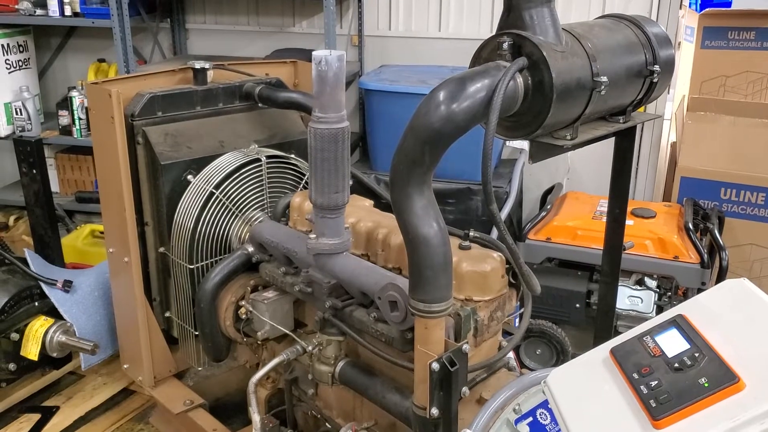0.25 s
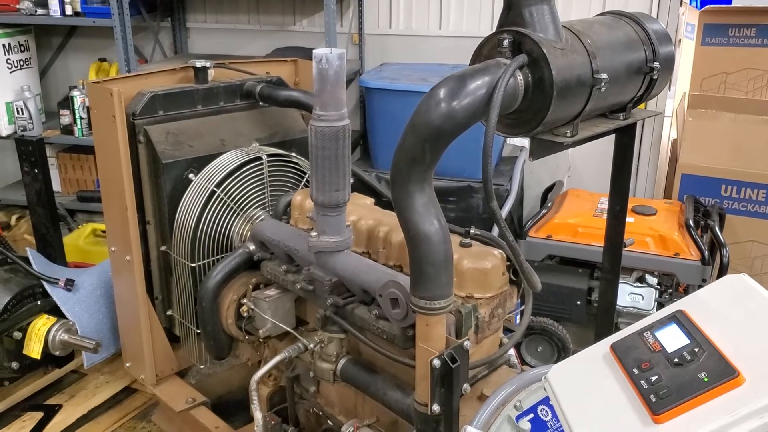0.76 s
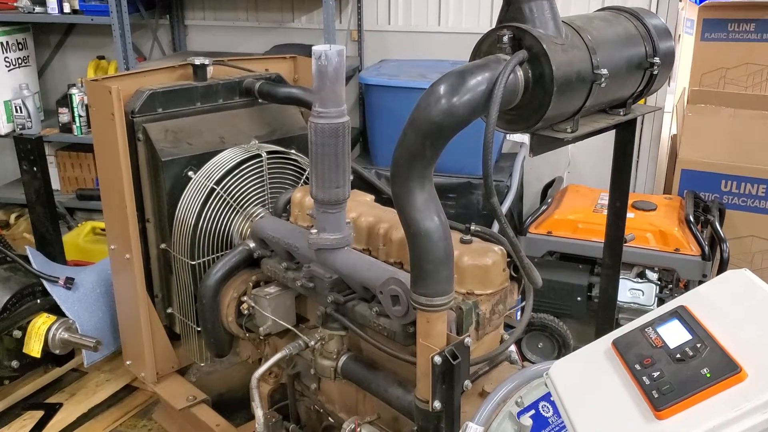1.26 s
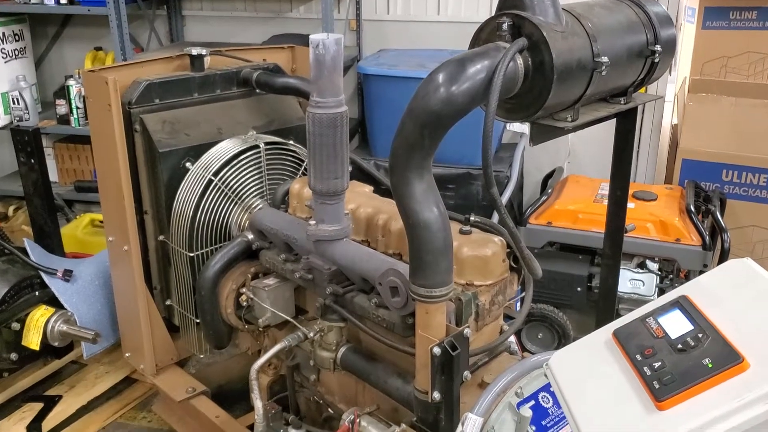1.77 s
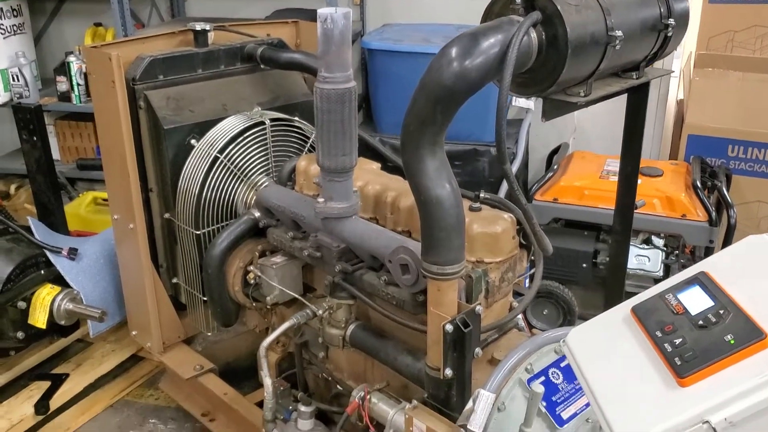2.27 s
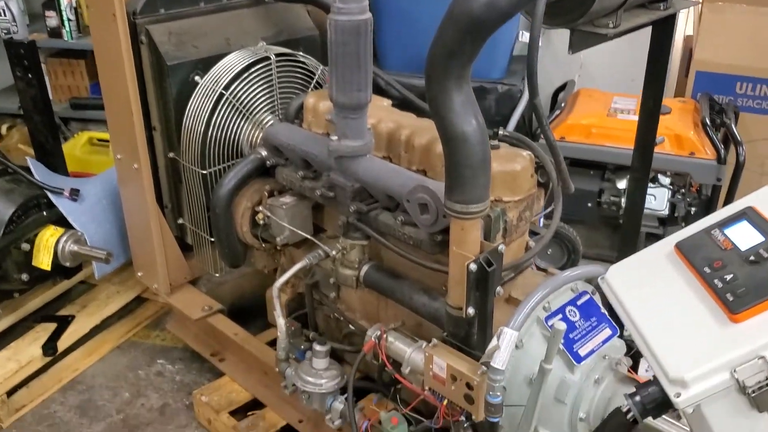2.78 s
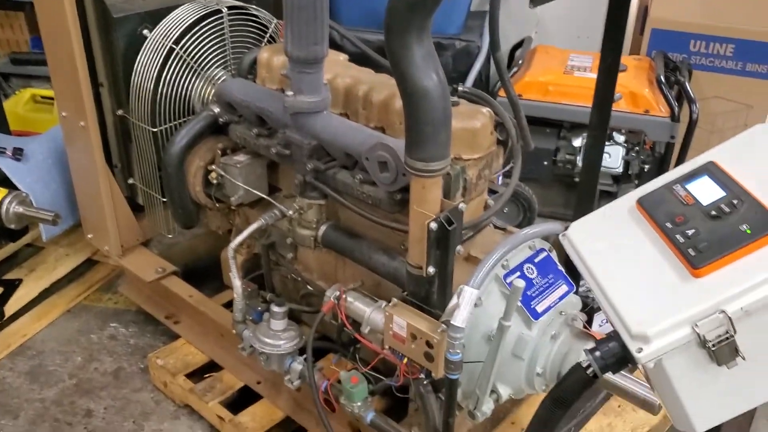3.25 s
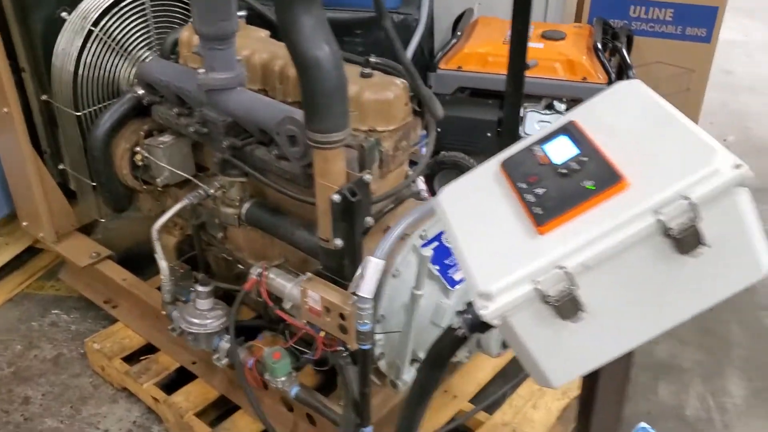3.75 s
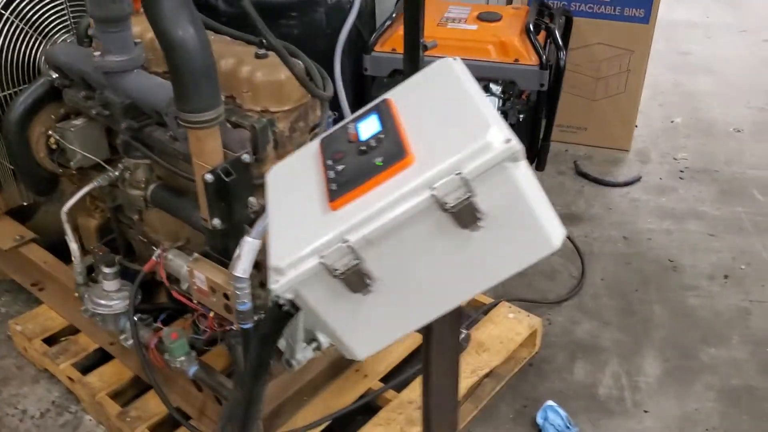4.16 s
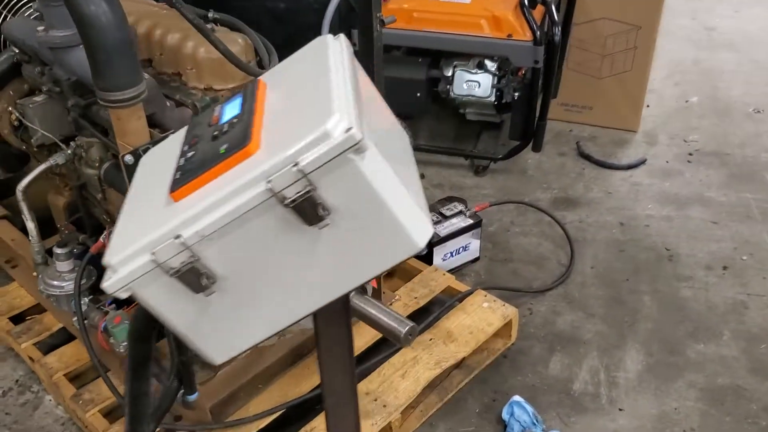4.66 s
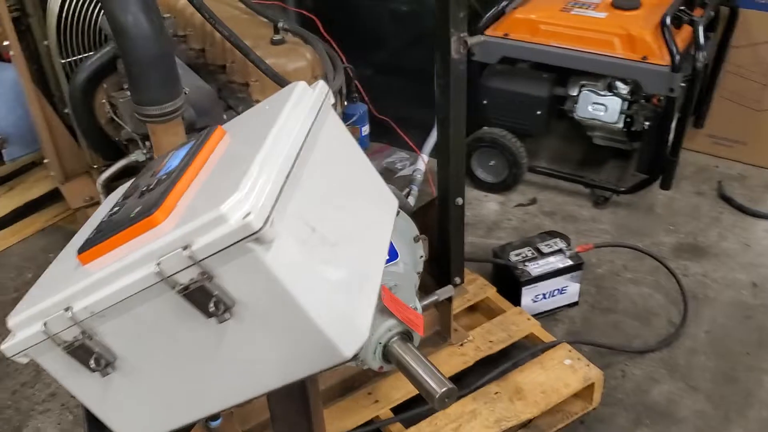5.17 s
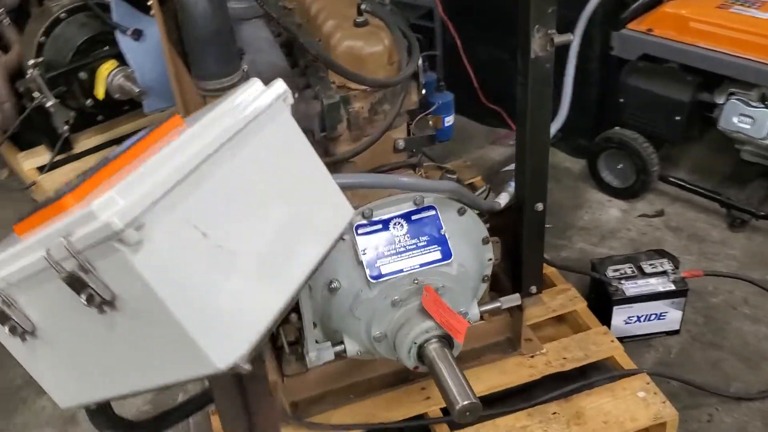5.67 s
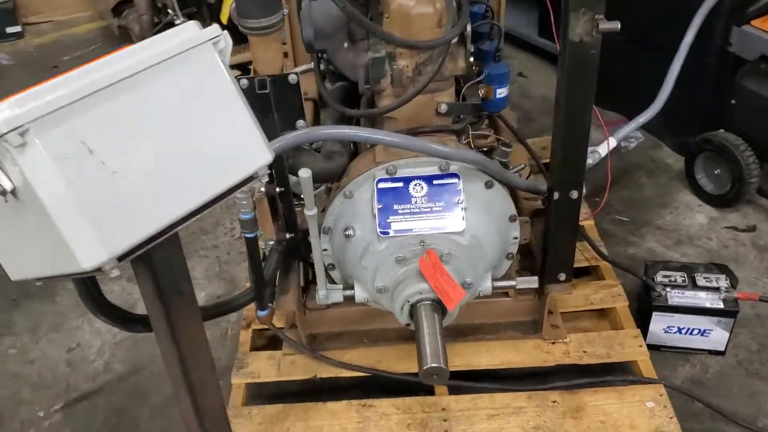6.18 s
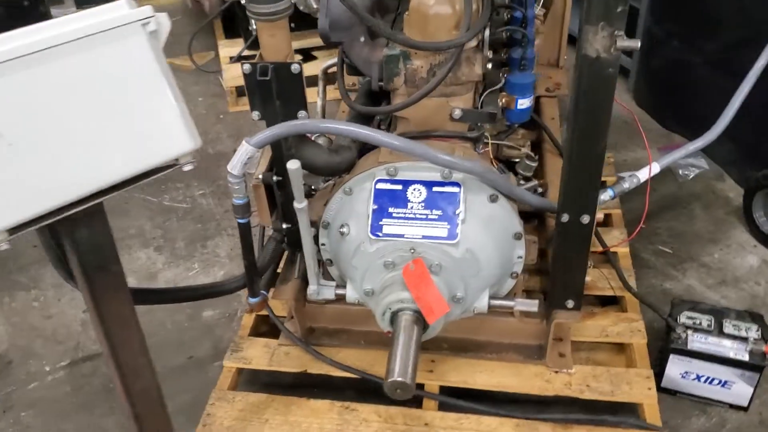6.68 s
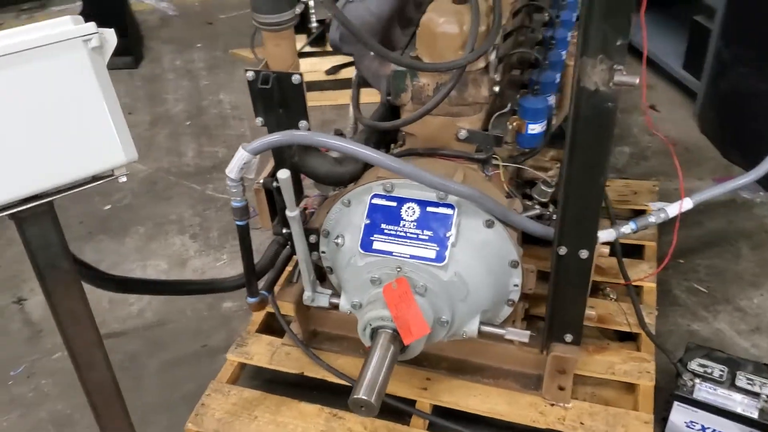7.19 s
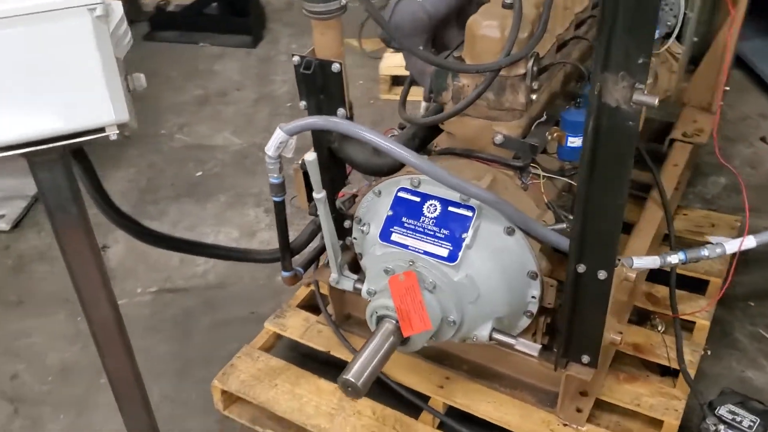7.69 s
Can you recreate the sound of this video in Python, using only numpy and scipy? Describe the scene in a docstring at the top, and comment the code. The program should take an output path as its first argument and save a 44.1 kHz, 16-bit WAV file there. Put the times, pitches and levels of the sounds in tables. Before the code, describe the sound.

From 0 s a large six-cylinder engine is already running in a workshop, heard close by in stereo, and it continues without a break to about 8 s. A deep, nearly pure exhaust boom around 85 Hz dominates, with a weaker octave and a low roar beneath. Over it lie a grainy growl, rapid dull knocks ringing in the metal block, and a fluttering hollow hum in a pipe, fullest near 3.6 s. Fan and intake air make a steady soft hiss with tiny valve ticks and crackle. From about 2.5 to 4.2 s the listener moves from side to rear; the mechanical colour shifts and the treble jumps brighter at 3.4 s, then settles. Around 4.75 s the hiss is slightly shaded. The boom swells a little near 5.6 s. The speed sinks gradually to about 80 firings per second, still running at the end.

```python
"""A large six-cylinder gas engine runs in a workshop, its speed slowly falling, as the listener walks from side to rear.
The exhaust booms as two tones at the firing rate and its octave; sines on multiples of the two-turn cycle add growl.
Clicks at set crank angles ring the block, and filtered noise that partly repeats each cycle makes it rumble.
Resonant noise flutters in a pipe near 265 Hz; fan air, intake hiss and valve ticks are noise in the treble.
A low roar of filtered noise lies under the boom."""
import sys
import numpy as np
from scipy import signal
from scipy.io import wavfile

SR = 44100
rng = np.random.default_rng(int(sys.argv[2]) if len(sys.argv) > 2 else 0)


def unload_wav(signal):
    """Save mono or channel-first audio to the path in sys.argv[1] as 16-bit WAV at rate SR, clipped to [-1, 1]."""
    wavfile.write(
        sys.argv[1],
        SR,
        np.round(np.clip(np.atleast_2d(signal).T, -1, 1) * 32767).astype(np.int16),
    )


N = 349713
SECONDS = np.arange(N) / SR
EARS = np.array([[1], [-1]])   # sign of a left-right difference in each ear


def amp(db):
    """dB to gain."""
    return 10 ** (np.asarray(db) / 20)


def rms_one(x):
    """Scale to rms 1."""
    return x / np.sqrt(np.mean(x ** 2) + 1e-20)


def in_time(rows):
    """Columns of a curve, one value per sample."""
    s, *columns = np.transpose(rows)
    return [np.interp(SECONDS, s, c) for c in columns]


def at_hz(points, hz):
    """Read a spectrum on a log-frequency axis."""
    table_hz, values = np.transpose(points)
    return np.interp(np.log(hz), np.log(table_hz), values)


def drift(rate_hz):
    """Random wander of rms 1: noise through two equal low-pass poles, computed at every 40th sample."""
    pole = np.exp(-80 * np.pi * rate_hz / SR)
    white = rng.standard_normal(N // 40 + 2002)
    slow = signal.lfilter([1], [1, -2 * pole, pole * pole], white)[2000:]   # skip the filter's start
    return np.interp(np.arange(N) / 40, np.arange(len(slow)), rms_one(slow))


def resonate(x, hz, width_hz):
    """A resonance applied twice: steep skirts, soft onset; the width is that of one pass."""
    r = np.exp(-np.pi * width_hz / SR)
    section = [1, 0, -1, 1, -2 * r * np.cos(2 * np.pi * hz / SR), r * r]
    return signal.sosfilt([section, section], x) * ((1 - r * r) / 2) ** 2


# The walk around the engine. Each row: time in seconds, share of the way from side to rear [0-1].
WALK = [(0, 0.28), (2.0, 0.1), (2.8, 0.32), (3.2, 0.72), (4.2, 0.97), (5.5, 0.9), (7.93, 1)]


def toward_rear(side_db, rear_db):
    """A level that turns from its value at the side to its value at the rear."""
    return side_db + (rear_db - side_db) * np.clip(in_time(WALK)[0], 0, 1)


def near_spot(db, spot_s, less_db, reach_s):
    """A level that belongs to one spot of the walk and falls by less_db away from it."""
    nearness = np.exp(-((SECONDS - spot_s) / reach_s) ** 2)
    return db - less_db * (1 - nearness)


# How alike the ears are. Each row: frequency in Hz, left-right likeness [held within 0-1 when read].
LIKENESS = [(60, 1.0), (130, 0.98), (290, 0.99), (640, 0.87), (1410, 0.25), (3100, 0.067), (6820, -1),
            (15000, -0.02)]
# Balance of the ears. Each row: frequency in Hz, left minus right level in dB.
TILT = [(60, -4), (110, -3.5), (200, -1.5), (380, -0.5), (700, -2.5), (1290, -1.5), (2380, -2),
        (4400, -0.5), (8120, -2.5), (15000, -2.5)]


def spread(mid, side, hz):
    """Two ears from a shared and an opposed signal, as alike and as balanced as the tables say."""
    alike = np.clip(at_hz(LIKENESS, hz), 0, 1)
    ears = np.sqrt(1 + alike) * mid + np.sqrt(1 - alike) * side * EARS
    return ears * amp(at_hz(TILT, hz) / 2 * EARS) / np.sqrt(2)


SURGE_DB, SURGE_RATE_HZ = .8, 8.0   # each noise band briefly swells and sinks on its own
PATCHY_RATE_HZ = 2.9


def coloured(white, at_side, at_rear, edges, patchy_db):
    """Stereo noise through a band bank whose gains follow the walk and flicker; rms 1."""
    out = 0
    for k, (low, high) in enumerate(zip(edges, edges[1:])):
        band = signal.butter(2, [low, high], "band", fs=SR, output="sos")
        mid, side = signal.sosfilt(band, white[k % 2])   # neighbouring bands use separate noise
        hz = np.sqrt(low * high)
        level_db = toward_rear(at_hz(at_side, hz), at_hz(at_rear, hz))
        flicker_db = patchy_db * drift(PATCHY_RATE_HZ) + SURGE_DB * drift(SURGE_RATE_HZ)
        out = out + amp(level_db + flicker_db) * spread(mid, side, hz)
    return rms_one(out)


def turning_noise(cycles, repeating):
    """Many small contacts: part returns every cycle and changes slowly with the walk, part is new each time."""
    steps = 3160   # noise values around one cycle
    pattern = rng.standard_normal((2, 2, 9, steps))   # one pattern for each second
    step = (cycles % 1 * steps).astype(int)
    now = SECONDS.astype(int)
    fade = SECONDS % 1 * np.pi / 2   # equal-power crossfade to the next pattern
    cyclic = pattern[:, :, now, step] * np.cos(fade) + pattern[:, :, now + 1, step] * np.sin(fade)
    fresh = rng.standard_normal((2, 2, N))
    return np.sqrt(repeating) * cyclic + np.sqrt(1 - repeating) * fresh


# The boom between the ears. Each row: time in seconds, left minus right level in dB, left lag in samples.
BOOM_SIDE = [(0, -.1, 1.6), (3.1, -.3, 2.4), (4.4, -.1, -1.4), (5.1, -.5, -1), (6.2, -.8, 5),
             (7.93, -.7, 9)]
# The octave slips behind the firing tone along the walk.
OCTAVE_RAD, OCTAVE_RAD_PER_S = .95, -.19
OCTAVE_WAVER_DB, OCTAVE_WAVER_HZ = 0.66, 32


def exhaust(firings, tone_db, octave_db):
    """Gas pulses boom as a firing tone and its octave, reaching the ears a little apart."""
    pan_db, lag = in_time(BOOM_SIDE)
    phase = 2 * np.pi * (firings - EARS / 2 * lag * np.gradient(firings))
    octave_phase = 2 * phase + OCTAVE_RAD + OCTAVE_RAD_PER_S * SECONDS
    octave_gain = amp(octave_db + OCTAVE_WAVER_DB * drift(OCTAVE_WAVER_HZ))
    tones = amp(tone_db) * np.cos(phase) + octave_gain * np.cos(octave_phase)
    return np.sqrt(2) * tones * amp(EARS / 2 * pan_db)


# Uneven cylinders sound multiples of the two-turn cycle. Each row: multiple of the cycle rate,
# level at its loudest spot in dB before the shared trim, time of that spot in seconds, dB less elsewhere.
CYCLE_TONES = [(14, -42, 5.2, 2.5), (15, -42, 7.0, 7), (16, -43, 2.8, 3), (18, -35, 2.2, 2.5),
               (20, -32, 7.9, 9), (21, -42, 7.2, 6), (22, -39, 2.5, 13), (24, -39, 3.0, 7),
               (25, -39, 4.2, 6), (26, -41, 7.9, 8), (27, -41, 7.9, 7), (28, -36, 5.8, 4), (29, -41, .8, 9),
               (30, -34, 7.9, 7), (32, -40, 4.0, 8), (36, -43, 7.9, 12), (40, -41, 5.8, 5),
               (42, -44, 6.5, 9), (48, -41, 3.0, 7), (53, -39, 4.2, 10), (54, -42, 7.9, 9),
               (58, -40, 7.9, 9), (59, -41, .1, 8), (61, -42, 4.2, 3), (67, -43, 1.5, 2), (69, -43, 6.5, 9),
               (71, -43, 4.8, 9), (73, -42, 7.9, 8)]
TONES_DB, TONE_REACH_S = 0.5, 2.1   # shared trim; how long the walk stays near a loud spot


def cycle_tones(cycles):
    """Sines on multiples of the cycle rate, each wavering a little in phase and level."""
    out = 0
    for multiple, *spot in CYCLE_TONES:
        turns = multiple * cycles + rng.random((2, 1)) + 0.048 * drift(2.1)
        level_db = near_spot(*spot, TONE_REACH_S) + TONES_DB + 0.97 * drift(4.3)
        mid, side = np.sqrt(2) * amp(level_db) * np.cos(2 * np.pi * turns)
        out = out + spread(mid, side, multiple * np.gradient(cycles).mean() * SR)
    return out


def struck(clicks, hz, width_hz):
    """A unit click rings to a peak of 1; a weaker, later copy enters the ears with opposite signs."""
    unit_peak = resonate(signal.unit_impulse(2999), hz, width_hz).max()
    ring = resonate(clicks, hz, width_hz) / unit_peak
    return np.sqrt(2) * spread(ring, .5 * np.roll(ring, 12), hz)


# Knocks in the block. Each row: crank angle in degrees, push (1) or pull (-1), ring in Hz, peak at a spot
# of the walk in dB before scatter and trim, time of that spot in seconds, dB less elsewhere [negative: more].
KNOCKS = [(20, 1, 640, -31, 7.9, 15), (40, 1, 880, -24, 2.2, 6), (75, -1, 700, -29, 7.0, 15),
          (105, 1, 900, -37, 4.4, -7), (185, -1, 880, -27, 2.6, 5), (300, -1, 900, -26.5, 4.2, 3),
          (385, -1, 900, -29, 5.0, 4), (420, 1, 640, -31, 3.5, 7), (545, 1, 880, -30, 5.0, 3),
          (660, 1, 850, -21, 4.7, 7), (685, -1, 740, -27, 7.9, 13)]
# Modes of the block. Each row: frequency in Hz, width in Hz, peak in dB against the knock.
BLOCK_MODES = [(672.4, 38, -14.5), (743.6, 35, -15.5), (788.3, 29, -18.5), (851, 50, -10.5),
               (935, 42, -21.5), (981.4, 31, -20.5)]
KNOCK_WIDTH_HZ, KNOCK_SPREAD_DB, KNOCK_REACH_S = 250, 1.7, 1.76
KNOCK_DB, KNOCK_CUT_HZ = -1, 1550   # trim and low-pass of all knocks together


def knocks(cycles):
    """Each contact comes once a cycle with scattered strength, thumps briefly and rings the block's modes."""
    out, all_clicks = 0, 0
    for deg, sign, hz, *spot in KNOCKS:
        at = np.flatnonzero(np.diff(np.floor(cycles - deg / 720)))
        scatter_db = KNOCK_SPREAD_DB * rng.standard_normal(len(at))
        clicks = np.full(N, 1e-18)
        clicks[at] = sign * amp(near_spot(*spot, KNOCK_REACH_S)[at] + scatter_db)
        out = out + struck(clicks, hz, KNOCK_WIDTH_HZ)
        all_clicks = all_clicks + clicks
    for hz, width_hz, mode_db in BLOCK_MODES:
        out = out + amp(mode_db) * struck(all_clicks, hz, width_hz)
    low_pass = signal.butter(2, KNOCK_CUT_HZ, fs=SR, output="sos")
    return amp(KNOCK_DB) * signal.sosfilt(low_pass, out)


# Colour of the rumble from the side. Each row: frequency in Hz, relative level in dB per Hz.
RUMBLE_SIDE = [(180, -32), (300, -3), (350, -2), (372, -10), (409, -1), (475, -12), (530, -6), (620, -11),
               (794, -6.5), (863, -0.5), (1250, -18)]
# Colour of the rumble from the rear. Each row: frequency in Hz, relative level in dB per Hz.
RUMBLE_REAR = [(180, -41), (300, -1.5), (390, -3.5), (432, -3.5), (500, -9.5), (555, -2.5), (660, -8.5),
               (757, -4), (838, -12), (955, -5), (1250, -15.5)]
RUMBLE_DB, BLOCK_REPEATS = -28.5, .3   # rms level; share of the noise power that returns every cycle


def block_rumble(cycles):
    """Small contacts shake the block: partly repeating noise, coloured by the place of the listener."""
    edges = np.geomspace(290, 1250, 15)
    noise = turning_noise(cycles, BLOCK_REPEATS)
    return amp(RUMBLE_DB) * coloured(noise, RUMBLE_SIDE, RUMBLE_REAR, edges, patchy_db=.7)


# The engine passes from the left ear's side to the right's. Each row: time in seconds, left lag in samples.
ENGINE_LAG = [(0, -3), (3.7, -4), (4.3, -8), (6.3, 1), (7.93, 4)]


def lagged(x):
    """Each ear reads the sound half the lag early or late."""
    n = np.arange(N)
    shift = np.round(in_time(ENGINE_LAG)[0] / 2)
    return np.array([np.interp(n - shift, n, x[0]), np.interp(n + shift, n, x[1])])


# Pipe flutter. Each row: time in seconds, level in dB.
PIPE = [(0, -30.5), (2.0, -28.5), (3.6, -26.5), (5.0, -29.5), (6.6, -27.5), (7.93, -32)]
PIPE_HZ, PIPE_WIDTH_HZ = [255.7, 270], 26.4


def pipe_flutter():
    """Two close, narrow resonances turn white noise into a fluttering hum."""
    out = 0
    for hz in PIPE_HZ:
        mid, side = resonate(rng.standard_normal((2, N)), hz, PIPE_WIDTH_HZ)
        out = out + spread(mid, side, hz)
    return amp(in_time(PIPE)[0]) * rms_one(out)


# Colour of fan and intake air. Each row: frequency in Hz, relative dB per Hz at the side, same at the rear.
AIR = [(1100, 1, -2.5), (1310, -0.5, -1.5), (1610, 0.6, -2.5), (2510, 1.1, -3), (2750, -4.5, -2.5),
       (3220, -1.5, -5.5), (4300, -14, -10.5), (5220, -19, -17.5), (6700, -24.5, -18.5), (8840, -24.5, -22),
       (10260, -30, -25), (11430, -17, -17.5), (12960, -28, -24), (15600, -21.5, -24)]
# Valve seats, as brief swells of the treble hiss. Each row: crank angle in degrees, swell in dB at the side,
# swell in dB at the rear.
TICKS = [(80, 1.5, 2), (320, 1.5, 4), (620, 5, 1.5), (680, 1.5, 4)]
TICK_DEG = 10   # crank angle from a swell's peak to 1/e of its dB
AIR_REPEATS = .2   # share of the noise power that returns every cycle
LOW_SWELL, SPLIT_HZ = .35, 9000   # hiss below the split follows this share of the swell in dB


def air(firings):
    """Fan and intake hiss; the treble throbs with the firings, swells at valve seats and crackles finely."""
    deg = firings * 120 % 720
    swell_db = .7 * np.cos(2 * np.pi * firings + 1.5) - .8
    swell_db = swell_db + .5 * drift(40) + 1.3 * drift(300)   # the fine crackle
    for at, side_db, rear_db in TICKS:
        swell_db = swell_db + toward_rear(side_db, rear_db) * np.exp(-((deg - at) / TICK_DEG) ** 2)
    hz, side_db, rear_db = np.transpose(AIR)
    at_side, at_rear = np.transpose([hz, side_db]), np.transpose([hz, rear_db])
    noise = turning_noise(firings / 6, AIR_REPEATS)
    hiss = coloured(noise, at_side, at_rear, np.geomspace(1150, 17000, 27), patchy_db=.5)
    # each half of the split is filtered twice
    low = np.tile(signal.butter(2, SPLIT_HZ, "low", fs=SR, output="sos"), (2, 1))
    high = np.tile(signal.butter(2, SPLIT_HZ, "high", fs=SR, output="sos"), (2, 1))
    lower_hiss = signal.sosfilt(low, hiss) * amp(LOW_SWELL * swell_db)
    return lower_hiss + signal.sosfilt(high, hiss) * amp(swell_db)


AIR_DB = -30.5
# A control box comes between engine and listener and shades the air noise.
SHADE_DB, SHADE_S, SHADE_REACH_S = -1, 4.75, 1
# The treble brightens at once as the listener turns, then settles.
TURN_DB, TURN_S, TURN_FADE_S, TURN_HZ = 1.5, 3.4, .5, 6000


def heard_on_walk(hiss):
    """Air noise dips behind the box; its treble jumps at the turn."""
    since = SECONDS - TURN_S
    jump = amp(TURN_DB * (since > 0) * np.exp(-np.abs(since) / TURN_FADE_S)) - 1
    band = signal.butter(2, [TURN_HZ, TURN_HZ * 2.2], "band", fs=SR, output="sos")
    treble = signal.sosfilt(band, hiss)
    shade_db = near_spot(SHADE_DB, SHADE_S, SHADE_DB, SHADE_REACH_S)   # 0 dB away from the box
    return (hiss + jump * treble) * amp(shade_db)


# Colour of the low roar under the boom. Each row: frequency in Hz, relative level in dB per Hz.
ROAR = [(15, -17), (25, 5), (40, 2.5), (62, 8.5), (105, 12), (125, 1.5), (200, 1.5), (300, -7), (340, -20)]
ROAR_DB = -35.5


def low_roar():
    """Flickering bands of low noise, coloured alike at side and rear."""
    white = rng.standard_normal((2, 2, N))
    return amp(ROAR_DB) * coloured(white, ROAR, ROAR, np.geomspace(16, 330, 11), patchy_db=.6)


# Engine speed and exhaust boom. Each row: time in seconds, firings per second, firing tone in dB, octave in dB.
FIRING = [(0, 85.85, -8.9, -22.1), (0.5, 86.03, -9.6, -22.2), (1.4, 85.76, -9.5, -21.8),
          (2, 84.65, -9.5, -21.0), (2.4, 84.45, -9.6, -21.2), (3.3, 83.31, -9.8, -22.7),
          (3.8, 82.98, -10.2, -23.7), (4.3, 82.75, -10.8, -24.3), (5, 82.78, -9.8, -26.0),
          (5.6, 82.35, -8.8, -27.2), (6.1, 81.78, -9.8, -26.5), (6.8, 81.4, -9.8, -24.6),
          (7.1, 80.95, -10.4, -24.0), (7.5, 81.19, -9.6, -23.2), (7.93, 80.41, -10.0, -22.2)]
START_DEG = 89.1   # crank angle at the start


def scene():
    """Engine parts run from one crank angle: six firings, 120 degrees apart, make a cycle of two turns."""
    per_s, tone_db, octave_db = in_time(FIRING)
    firings = START_DEG / 120 + np.cumsum(per_s) / SR
    cycles = firings / 6
    boom = exhaust(firings, tone_db, octave_db)
    body = cycle_tones(cycles) + knocks(cycles) + block_rumble(cycles)
    hiss = amp(AIR_DB) * heard_on_walk(air(firings))
    return boom + lagged(body) + pipe_flutter() + hiss + low_roar()


CUTOFF_HZ = 15700


def record(dry):
    """A steep elliptic low-pass cuts the top."""
    return signal.sosfilt(signal.ellip(14, .05, 60, CUTOFF_HZ, fs=SR, output="sos"), dry)


dry = scene()
out = record(dry)
unload_wav(out)
```